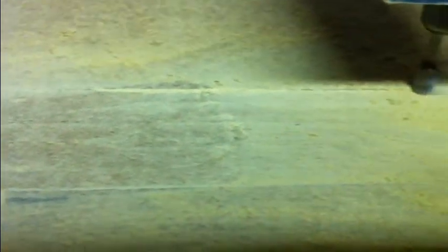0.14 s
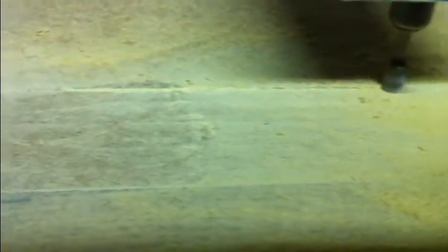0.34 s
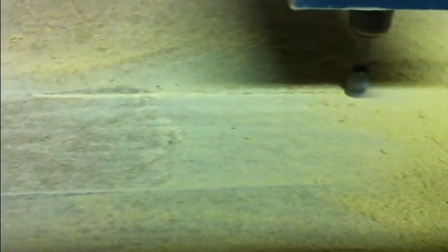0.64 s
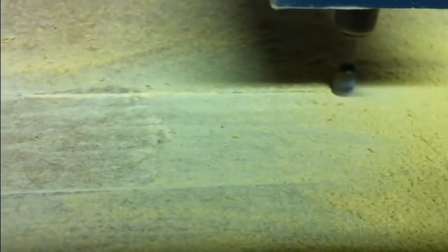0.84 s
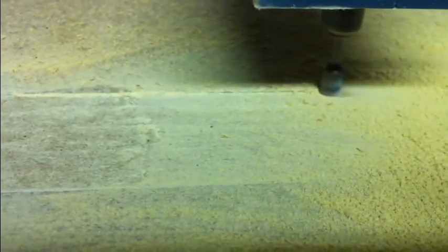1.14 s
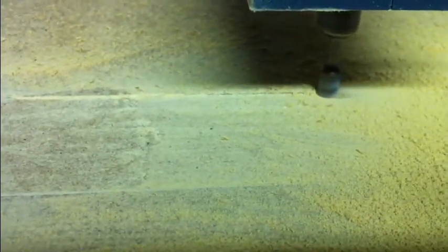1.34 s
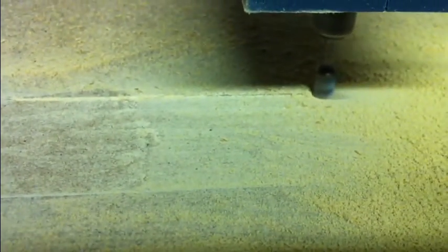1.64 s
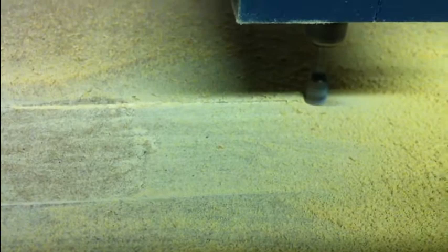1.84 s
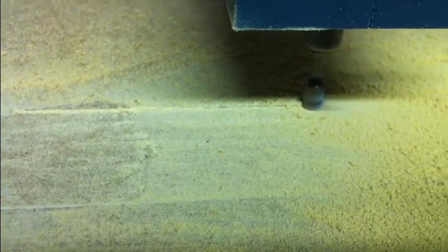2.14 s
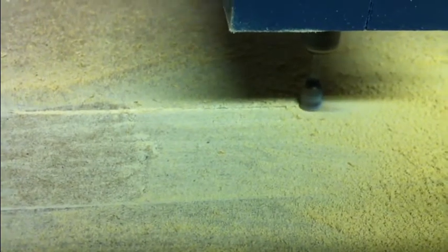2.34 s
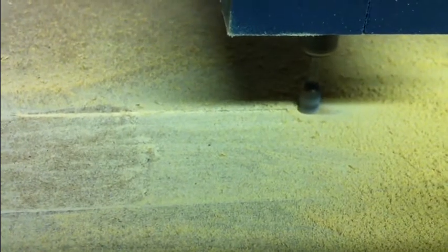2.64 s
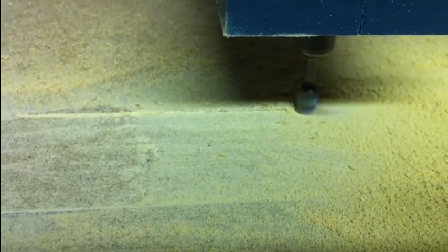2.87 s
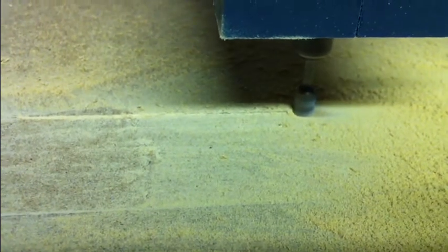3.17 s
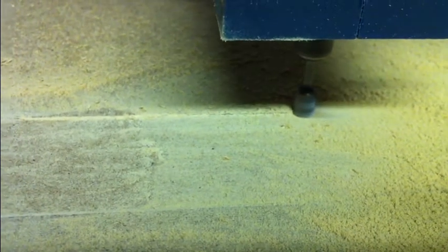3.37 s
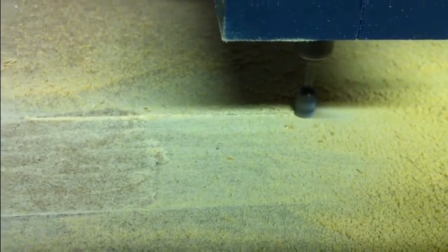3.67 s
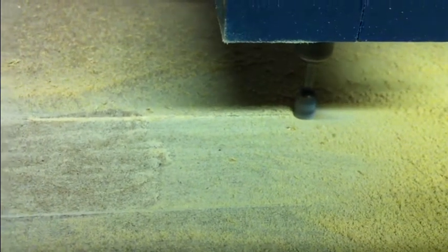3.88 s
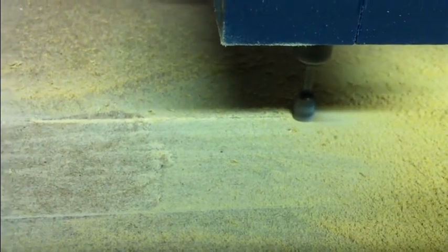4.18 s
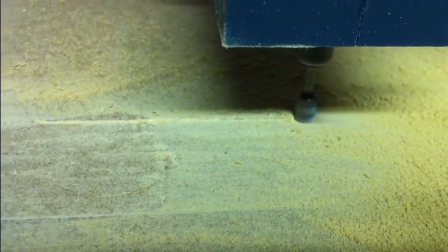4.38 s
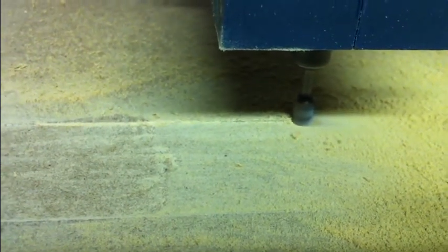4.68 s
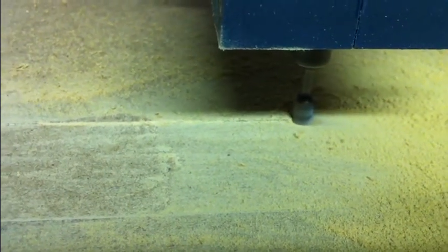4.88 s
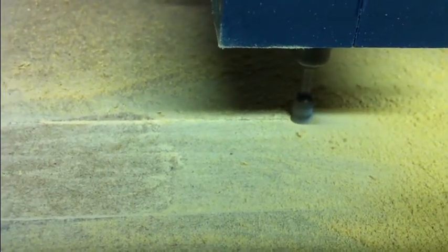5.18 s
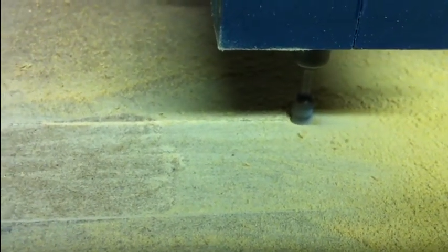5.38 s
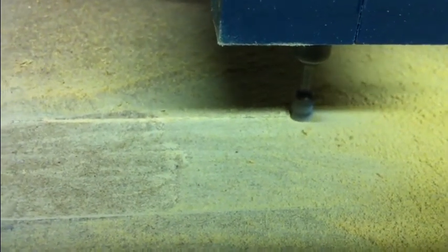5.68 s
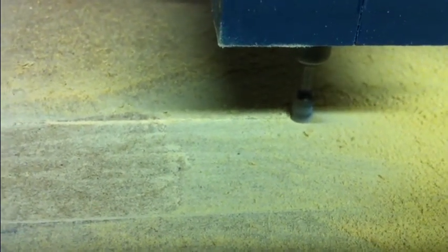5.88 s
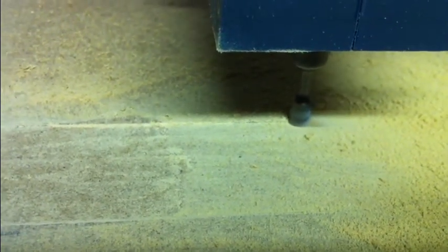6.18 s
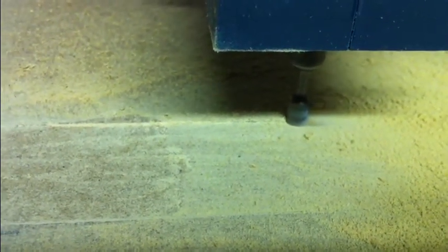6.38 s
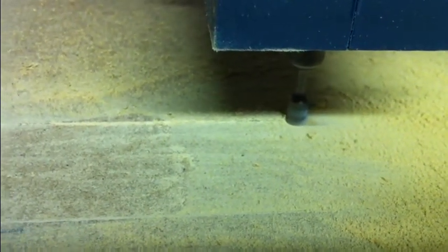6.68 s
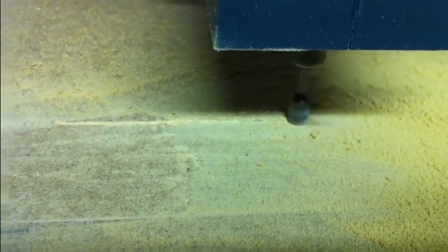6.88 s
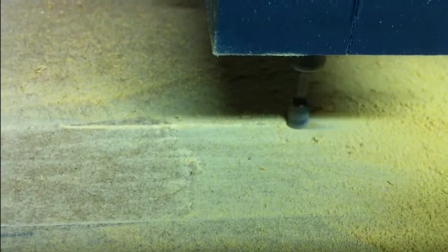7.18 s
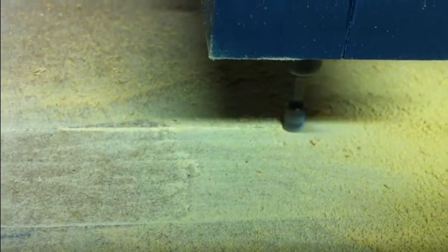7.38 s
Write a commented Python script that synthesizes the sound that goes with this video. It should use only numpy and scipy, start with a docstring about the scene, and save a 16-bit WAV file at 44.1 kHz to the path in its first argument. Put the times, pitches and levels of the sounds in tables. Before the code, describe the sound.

From 0 to about 7.5 seconds a spinning bit cuts a wooden board without pause, heard very close and nearly dry. About two hundred bites a second merge into a rough, grainy buzz, topped by bright tearing and hissing chips and filled by rushing air. Under it sits a low, nearly steady spindle hum, throbbing roughly three times a second, with thin wavering whines. The cut opens strongly, then settles into uneven flutter, easing near 0.9. Dry splinter ticks are scattered throughout, including a sharp one at 1.4; short ringing tool kicks come between them. Tearing swells around 2.8, thins noticeably at 3.6, then recovers by 3.9 with ticks and kicks clustered together. It grows harsher around 5.5, peaking at 5.6 with the strongest ringing kick. Afterwards it keeps rasping unevenly, with more ticks near 6.2, 6.6 and 7.1, and ends still cutting. Very faint soft bumps lie almost hidden underneath.

```python
"""A CNC router feeds a ball-nosed bit steadily along a wooden board, close to the microphone.
Once a turn the bit snaps into the wood and tears out a chip; a slower chatter of the tool makes the bites uneven.
Noise bursts for the bites ring the board and the machine, amid hissing chips and a steady rush of air.
Sine tones make the spindle's hum and whine; sharp ticks, ringing kicks and soft bumps are placed one by one."""
import sys
import numpy as np
from scipy import signal
from scipy.fft import rfft, irfft
from scipy.io import wavfile
from scipy.ndimage import uniform_filter1d

SR = 44100
rng = np.random.default_rng(int(sys.argv[2]) if len(sys.argv) > 2 else 0)


def to_wav(sig):
    """Store sig (one row per channel, or 1-D mono) as 16-bit WAV at the path in sys.argv[1].

    Samples outside -1..1 are clipped; the rate is SR.
    """
    pcm = np.clip(np.atleast_2d(sig), -1, 1) * 32767
    pcm = np.round(pcm).astype(np.int16)
    wavfile.write(sys.argv[1], SR, pcm.T)  # frames by channels


N = 331632
TIME = np.arange(N) / SR
CHATTER_HZ = 90.1


def gain_of(db):
    """Decibels to an amplitude factor."""
    return 10 ** (np.asarray(db) / 20)


def evened(x):
    """Scales to rms 1."""
    return x / np.sqrt(np.mean(x ** 2) + 1e-20)


def follow(rows):
    """The columns of a time curve, interpolated at every sample."""
    s, *columns = np.transpose(rows)
    return [np.interp(TIME, s, column) for column in columns]


def wander(rate_hz):
    """Smooth chance of rms 1, mostly slower than the given rate."""
    hz = np.fft.rfftfreq(N, 1 / SR)
    spectrum = rfft(rng.standard_normal(N)) / (1 + (hz / rate_hz) ** 4)
    return evened(irfft(spectrum, N))


def cut(x, hz, kind, order=4):
    """Butterworth high-pass or low-pass."""
    sos = signal.butter(order, min(hz, SR / 2 - 1), kind, fs=SR, output="sos")
    return signal.sosfilt(sos, x)


def below(x, edge_hz):
    """The part of a sound under an edge, with no delay."""
    hz = np.fft.rfftfreq(N, 1 / SR)
    return irfft(rfft(x) / (1 + (hz / edge_hz) ** 20), N)


def add(mix, s, sound):
    """Mixes a sound in at time s."""
    part = mix[max(round(s * SR), 0):][:len(sound)]
    part += sound[:len(part)]


# Soft low bumps in the background.
# Columns: centre_s, peak_db
SOFT_BUMPS = [(0.879, -69), (3.959, -65), (6.238, -59)]


def bumps(width_s=0.0036):
    """Single slow swings of pressure, down then up, with no ring."""
    out = np.zeros(N)
    for s, db in SOFT_BUMPS:
        age = (TIME - s) / width_s
        out += gain_of(db) * age * np.exp(.5 - .5 * age ** 2)
    return out


# Short dips that make the hum throb, about three a second.
# Columns: centre_s, depth_db
HUM_DIPS = [(0.38, -8), (0.68, -6), (1.005, -21), (1.75, -6), (2.03, -5.5), (2.37, -4.5), (2.72, -8),
            (3.055, -21), (3.39, 0), (3.77, -11), (4.42, -11), (4.76, -7), (5.11, -11), (5.425, -15),
            (5.78, -8), (6.1, -12), (6.455, -10), (6.82, -6), (7.125, -12), (7.47, -1)]


def throb(width_s=0.022):
    """The bell-shaped dips of the hum, in dB."""
    return sum(db * np.exp(-.5 * ((TIME - s) / width_s) ** 2) for s, db in HUM_DIPS)


# Hum at the turning rate, before its throb and waver.
# Columns: time_s, level_db (rms)
HUM_LEVEL = [(0.0, -53.5), (0.55, -52.5), (0.83, -51.5), (1.1, -53), (1.5, -53), (2.25, -53), (2.87, -53),
             (3.3, -55.5), (3.68, -61), (3.9, -53.5), (4.25, -54), (4.55, -54.5), (4.9, -57), (5.3, -55.5),
             (5.75, -51), (6.3, -54), (6.65, -51.5), (7.52, -56.5)]


def hum(turns, waver_db=1.5):
    """Unbalance of the spindle pushes once a turn: a throbbing, wavering sine."""
    hum_db, = follow(HUM_LEVEL)
    level_db = hum_db + throb() + waver_db * wander(rate_hz=18)
    return gain_of(level_db) * np.sin(2 * np.pi * turns)


# Whine of the spindle, before its level wavers.
# Columns: multiple (of the turning rate), level_db (rms), phase_waver_rad (rms)
WHINE_TONES = [(2, -67.5, 0.2), (5, -65.3, 0.65), (6, -66, 0.44), (8, -62, 0.65)]


def whine(turns):
    """Overtones that follow the turning rate, each wavering in level and phase."""
    out = np.zeros(N)
    for multiple, db, waver_rad in WHINE_TONES:
        level = gain_of(db + 1.4 * wander(rate_hz=5.7))
        phase = 2 * np.pi * round(multiple) * turns + waver_rad * wander(rate_hz=9.8)
        out += level * np.sin(phase)
    return out


# Thin side tones of turning and chatter, before their level wavers.
# Columns: pitch_hz, level_db (rms), phase_waver_rad (rms)
SIDE_TONES = [(115.8, -78.5, 0.88), (191, -68, 2.7), (222.3, -68, 1.4), (320, -78.5, 2.3),
              (915, -70.5, 1.3), (1318, -68, 1.8), (1719, -59, 1.9), (4020, -65.5, 2.3)]


def side_tones():
    """Thin side tones of turning and chatter, held at fixed pitch, wavering in level and phase."""
    out = np.zeros(N)
    for hz, db, waver_rad in SIDE_TONES:
        level = gain_of(db + 2.7 * wander(rate_hz=9.6))
        phase = 2 * np.pi * hz * TIME + waver_rad * wander(rate_hz=3.8)
        out += level * np.sin(phase)
    return out


def spindle(turns):
    """The lasting tones of the running machine: hum, overtones and side tones."""
    tones = hum(turns) + whine(turns) + side_tones()
    return np.sqrt(2) * tones  # a sine's rms is its peak over root 2


# Splinters that break off with a sharper tick.
# Columns: start_s, peak_db
SPLINTER_TICKS = [(0.113, -26), (0.368, -28), (0.7615, -28), (0.875, -28), (0.9445, -31), (1.137, -30),
                  (1.2499, -27), (1.4268, -24), (1.4611, -27), (1.573, -27), (1.8433, -26), (2.6468, -27),
                  (2.9162, -29), (3.4365, -30), (3.7995, -30), (3.9107, -29), (3.9536, -24.5),
                  (4.1188, -29), (4.1288, -26), (4.309, -30), (4.441, -29), (4.786, -27), (4.8297, -29),
                  (4.9408, -28), (5.5275, -28), (5.761, -27), (5.781, -28), (6.2294, -26), (6.6045, -27),
                  (6.6925, -27), (7.072, -27), (7.0966, -27), (7.1498, -29)]


def splinters(decay_s=0.0012, low_hz=4200, top_hz=14000):
    """Each splinter cracks as a short, bright, dying burst of noise."""
    out, t = np.zeros(N), np.arange(SR // 100) / SR
    for s, db in SPLINTER_TICKS:
        fizz = np.tanh(rng.standard_normal(len(t)))
        crack = cut(fizz * np.exp(-t / decay_s), low_hz, "high", order=2)
        crack = cut(crack, top_hz, "low", order=2)
        add(out, s, gain_of(db) * crack / abs(crack).max())
    return out


# Hard bites that ring the tool.
# Columns: start_s, peak_db (of the swell)
TOOL_KICKS = [(0.191, -29), (0.5147, -31), (0.593, -32), (1.7058, -30), (2.6474, -31), (2.6716, -31),
              (2.8818, -33), (2.9803, -33), (3.3491, -32), (3.4224, -36), (3.5141, -31), (3.9238, -31),
              (3.9538, -30), (4.7952, -30), (5.2707, -31), (5.6251, -26.5), (5.9816, -31), (6.5132, -32)]


def hard_bites(ring_hz=1810, spread=0.032, swell_s=0.00086):
    """A hard fibre kicks the tool, which rings for a few milliseconds."""
    out, t = np.zeros(N), np.arange(SR // 50) / SR
    swell = t / swell_s * np.exp(1 - t / swell_s)
    for s, db in TOOL_KICKS:
        pitch_hz = ring_hz * (1 + spread * rng.standard_normal())
        add(out, s, gain_of(db) * swell * np.sin(2 * np.pi * pitch_hz * t))
    return out


# Broad colour of the cut.
# Columns: pitch_hz, level_db (relative)
CUT_COLOUR = [(30, -32), (66, -23), (105, -10), (400, -3), (800, -2.5), (1400, 3.5), (2500, 0), (4500, -2),
              (6500, -5.5), (12000, -6), (15500, -6.5)]
# Resonances and hollows of board and machine, added to the broad colour.
# Columns: pitch_hz, width_hz (of the bell curve), early_db, midway_db, late_db
BOARD_RESONANCES = [(130, 6.4, 8.5, 10.5, 7.5), (145, 6.6, 6, 2, 5), (192, 17, 5.5, 9, 7),
                    (254, 11, 5, 2.5, 0.5), (315, 11, 2, 2, 1), (389, 8, -9, -6, -3),
                    (434, 8, -7, -1, -2.5), (480, 25, 3, 3, 4.5), (590, 19, -3, -4, -5.5),
                    (1000, 45, 3, 3, 2), (1533, 20, 8, 3.5, 1), (1577, 23, -3.5, -4, -3.5),
                    (1637, 19, 2, 1.5, 2.5), (1704, 20, 4.5, 2, 5), (1814, 185, 7, 8, 7.5),
                    (1818, 14, 2.5, 0, 2), (1868, 24, -2.5, -7.5, -6), (1945, 15, 5, 2.5, 2.5),
                    (2096, 47, 7.5, 6, 4.5), (2164, 16, -5, -2.5, -6), (2230, 24, 4, 1, 1.5),
                    (2430, 40, -0.5, -3, 1.5), (2740, 28, 7.5, 1, -1), (2950, 140, 4.5, -0.5, -0.5),
                    (3140, 53, 0, 1.5, 4.5), (4033, 57, 3, 8.5, 5.5), (4284, 73, 6, 7, 7),
                    (4640, 85, 4.5, 6.5, 7), (5190, 205, 4, 3.5, 3.5), (5940, 71, 0, -4.5, 0),
                    (6570, 90, -2, 0.5, 1), (7060, 110, 2.5, 3.5, 1.5), (7740, 164, 5.5, 4, 2),
                    (8030, 89, 2, 0, 4), (8450, 71, -2, -8, -12), (8760, 270, 5.5, 2.5, 0.7),
                    (9600, 130, -1, 1.5, -0.5), (11650, 180, 1, 1.5, 4.5), (12200, 280, 3.5, 3, 1),
                    (14900, 300, -5, -3, -5)]


def ring(x, column, size=8192):
    """Causal response of board and machine at one place of the bit."""
    hz = abs(np.fft.fftfreq(size, 1 / SR))
    knots, level = np.transpose(CUT_COLOUR)
    db = np.interp(np.log(hz + 1), np.log(knots), level)
    for centre, width, *heights in BOARD_RESONANCES:
        db = db + heights[column] * np.exp(-.5 * ((hz - centre) / width) ** 2)
    # minimum phase: the response starts at once and dies away
    spectrum = np.exp(np.conj(signal.hilbert(np.log(gain_of(db)))))
    taps = np.fft.ifft(spectrum).real
    return signal.oaconvolve(x, taps[:size // 2])[:N]


def gantry(x, echo_db=-15, t60=0.09):
    """Short reflections from the bed and the gantry, whose narrow faces throw back only the treble."""
    t = np.arange(SR // 8) / SR
    echoes = rng.standard_normal(len(t)) * (rng.random(len(t)) < 2000 / SR)  # about 2000 a second
    taps = echoes * (t > .002) * gain_of(-60 * t / t60)
    taps = cut(taps / np.linalg.norm(taps), 2280, "high")
    return x + gain_of(echo_db) * signal.oaconvolve(x, taps)[:N]


# Moments when the bit passes the early, middle and late places on the board.
# Values: time_s
BIT_PLACES = [0.91, 3.1, 6.4]


def board(x):
    """The resonances and reflections change as the bit travels along the board."""
    nearness = [np.interp(TIME, BIT_PLACES, only) for only in np.eye(len(BIT_PLACES))]
    return evened(sum(near * gantry(ring(x, column)) for column, near in enumerate(nearness)))


def patchy(x, depth_db, frames, bins, size=1024):
    """The colour of the cut shifts in small patches of time and pitch."""
    overlap = size - size // 4
    z = signal.stft(x, nperseg=size, noverlap=overlap)[2]
    field = rng.standard_normal(z.shape)
    field = uniform_filter1d(field, max(round(bins), 1), 0)
    field = evened(uniform_filter1d(field, max(round(frames), 1), 1))
    return signal.istft(z * gain_of(depth_db * field), nperseg=size, noverlap=overlap)[1][:N]


def stroke(turns, delay, length):
    """A push once a turn that starts sharply and dies away; delay and length are in turns."""
    age = ((turns - delay) % 1) / max(length, .01)
    return evened(np.sqrt(age) * np.exp(-age))


def bites(turns, uneven_db, chatter):
    """Size of each chip: the grain of the wood varies it by chance, the chatter of the tool in a beat."""
    which = np.floor(turns).astype(int)
    grain = np.clip(rng.standard_normal(which.max() + 1), -2, 2)[which]
    beat = 1 + np.clip(chatter, 0, .99) * np.sin(2 * np.pi * CHATTER_HZ * TIME)
    return evened(gain_of(uneven_db * grain) * np.sqrt(beat))


def fibres(per_s, spread_db):
    """Dense clicks of breaking fibres, a few of them large."""
    size = gain_of(spread_db * np.minimum(rng.exponential(1, N), 2))
    return evened(size * rng.choice([-1, 1], N) * (rng.random(N) < per_s / SR))


def knocks(turns, delay, jitter):
    """One blunt blow a turn, a little early or late (in turns): a buzz of overtones."""
    passed = np.floor(turns - delay + jitter * wander(rate_hz=60))
    return evened(cut(np.diff(passed, prepend=passed[0]), 630, "high"))


# Load on the bit as it meets harder and softer wood, relative to the usual; each layer takes up a share.
# Columns: time_s, ring_load_db, tearing_load_db, hiss_load_db
WOOD_LOAD = [(0.0, 3, 7, 2.5), (0.12, 1.5, 1, 2), (0.25, -3, 0.5, -1), (0.35, 2, 0.5, 1),
             (0.45, 0, -0.3, -0.5), (0.54, -2.5, -0.5, 0.5), (0.63, 0, -1, -1.5), (0.75, 3, 1, 1.5),
             (0.85, 1.3, -1.5, -1), (0.92, -6, -3, -3.5), (1.02, -2, -2, -3.5), (1.12, -1, -1, 2),
             (1.25, 1.8, -1.7, -1.5), (1.42, 2.5, 0, 2), (1.6, -3.5, -2, -2.5), (1.73, 1, -0.7, 1.3),
             (1.86, -3, 0, 1.1), (2.02, 0.5, -1.5, -2), (2.25, -3, -0.5, 0.5), (2.57, 0.5, -0.5, -0.6),
             (2.68, 4, 0, 0), (2.77, 3, 4.5, 2.5), (2.9, 4, 1.5, 1.8), (3.07, -1, -0.8, -0.5),
             (3.24, -1, 0, -0.5), (3.42, 1, 1.5, 0.5), (3.52, -4, -1, -2), (3.61, -11, -6, -3.5),
             (3.72, 1, -3, -3), (3.79, -5, -2, -2.5), (3.92, 3, 1.5, 0.8), (4.04, 2.2, -3, -5.5),
             (4.13, 2.5, 3, 1), (4.24, 1, 1, 2.5), (4.34, -3, -2.5, -0.5), (4.46, 1.5, 3, 2.5),
             (4.58, -3, -2, -3.5), (4.69, -4.5, -1.5, -1), (4.86, -2.2, -2, -2.5), (5.07, 2, 0.3, 0.5),
             (5.23, -2, -3, -2.5), (5.38, -1.5, 1.5, -0.5), (5.53, 2, 3, 3), (5.63, 6, 5.5, 3.5),
             (5.76, 1, 3, 2), (5.86, -3.5, -0.5, -0.4), (5.99, 3, 1, 1), (6.14, -4.5, -2.5, -2.5),
             (6.25, 1.5, 1.3, 1), (6.42, -2, -0.8, 0), (6.51, 0, 2, 1), (6.61, 2.5, 0, 2),
             (6.73, -1.2, 1.5, 0.2), (6.9, -2, 1.2, 2), (7.02, -0.5, -1, -3.5), (7.09, 0.3, 2, 2),
             (7.16, -6, -2.5, -2), (7.38, 1, 0.6, -1), (7.52, -4, 0.5, 0)]


def load_on_bit(grain_db=0.5, grain_hz=22):
    """The load on ring, tearing and hiss in dB: slow changes along the board and a flutter from the grain."""
    flutter_db = grain_db * wander(rate_hz=grain_hz)
    return [slow_db + flutter_db for slow_db in follow(WOOD_LOAD)]


# levels at the usual load: rush of board and air, ring of the tool, hiss of the chips
RUSH_DB, RING_DB, CHIPS_DB = -48.5, -42.0, -40
# dB that each of them gains for one dB of load
RUSH_PER_LOAD, RING_PER_LOAD, CHIPS_PER_LOAD = 0.44, 0.39, 0.61
# depth of the sway in level of tool and chips, where turning and chatter meet
SWAY, CHIPS_SWAY = 0.38, 0.057


def cutting(turns):
    """Each turn gives a bright snap, then a knock and a duller tear; air and flying dust fill the time between."""
    ring_db, tear_db, hiss_db = load_on_bit()

    # hard and soft fibres of the wood change the force of the bite, up to a limit
    hardness = gain_of(2.37 * np.tanh(wander(rate_hz=31)))
    first_bite = hardness * bites(turns, uneven_db=2.0, chatter=0.64)
    bite = hardness * bites(turns, uneven_db=1.7, chatter=0.3)
    snap = first_bite * stroke(turns, delay=0, length=0.079) * fibres(per_s=22000, spread_db=1.0)
    tear = bite * stroke(turns, delay=0.06, length=0.46) * fibres(per_s=18000, spread_db=1.0)
    knock = bite * knocks(turns, delay=0.2026, jitter=0.022)
    air, dust = rng.standard_normal((2, N))

    # below the tool's own ring the board rumbles
    body = air + gain_of(-11) * snap + gain_of(-10.0) * tear + gain_of(-15.5) * knock
    body = patchy(cut(body, 1489, "low", order=8), depth_db=1.26, frames=7, bins=4, size=2048)

    # the tool's own band sways at the sum of the turning and chatter rates
    sway = 1 + SWAY * np.sin(2 * np.pi * (turns + CHATTER_HZ * TIME - 0.2))
    tool = sway * (tear + gain_of(4.0) * air + gain_of(-3.5) * knock)
    tool = cut(cut(tool, 1499, "high", order=7), 2316, "low", order=7)

    # above it the wood tears and the chips hiss, swaying at the difference of the two rates
    bright_snap = cut(cut(snap, 5660, "high", order=2), 8800, "low", order=1)
    bright_tear = cut(tear, 6860, "high")
    bright_dust = cut(dust, 9600, "high", order=2)
    bright = gain_of(1.2) * bright_snap + gain_of(-1.0) * bright_tear + gain_of(-10.5) * bright_dust
    dull_tear = cut(tear, 6250, "low")
    chips = cut(air + bright + gain_of(-3.5) * dull_tear, 2327, "high", order=8)
    chips = chips * (1 + CHIPS_SWAY * np.cos(2 * np.pi * (turns - CHATTER_HZ * TIME + 0.12)))
    chips = board(patchy(chips, depth_db=1.1, frames=7, bins=10.0))
    tearing = below(chips, edge_hz=5700)
    hiss = chips - tearing

    return (gain_of(RUSH_DB + RUSH_PER_LOAD * ring_db) * board(body)
            + gain_of(RING_DB + RING_PER_LOAD * ring_db) * board(tool)
            + gain_of(CHIPS_DB + CHIPS_PER_LOAD * tear_db) * tearing
            + gain_of(CHIPS_DB + CHIPS_PER_LOAD * hiss_db) * hiss)


# Spindle speed, drifting slightly.
# Columns: time_s, turning_rate_hz
SPINDLE_SPEED = [(0.0, 204.2), (0.5, 203.1), (1.0, 202.7), (1.7, 203.9), (2.05, 203.2), (2.4, 204.8),
                 (2.8, 204.6), (3.2, 205.8), (3.6, 207.2), (4.1, 205.5), (4.7, 205.5), (5.25, 206.5),
                 (5.8, 205.3), (6.2, 204.9), (7.52, 205.7)]


def scene():
    """One spindle drives both the cut and the hum."""
    speed_hz, = follow(SPINDLE_SPEED)
    turns = np.cumsum(speed_hz) / SR
    mix = bumps() + spindle(turns) + splinters() + hard_bites() + cutting(turns)
    return mix[None]  # one microphone channel


def record(dry, edge_hz=15780):
    """The band limit of the recorder: a steep low-pass with no delay."""
    taps = signal.firwin(1023, edge_hz, window=("kaiser", 9), fs=SR)
    return signal.oaconvolve(dry, taps[None], "same")


dry = scene()
out = record(dry)
to_wav(out)
```